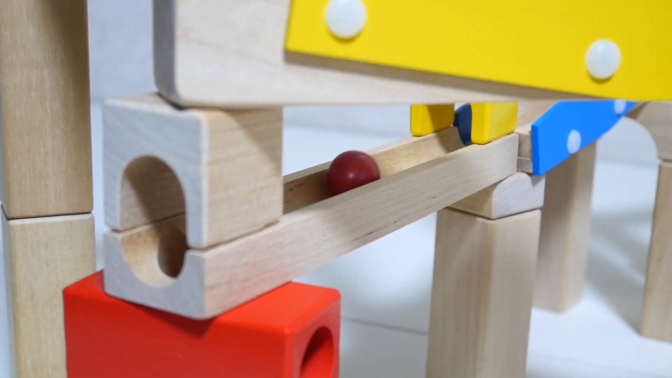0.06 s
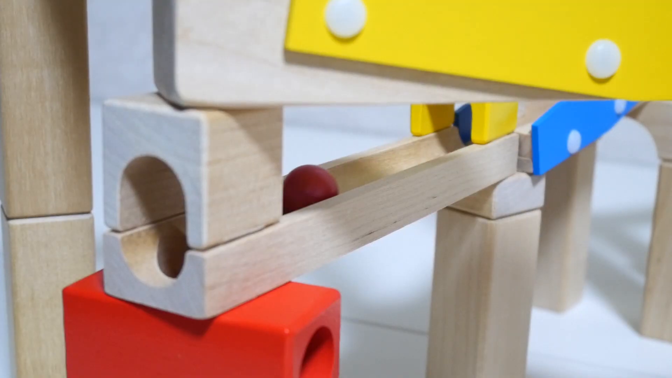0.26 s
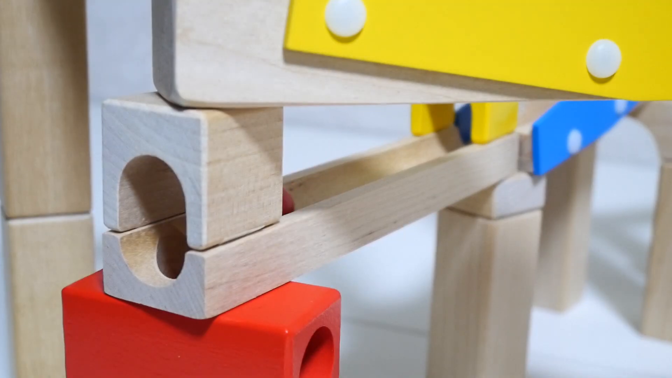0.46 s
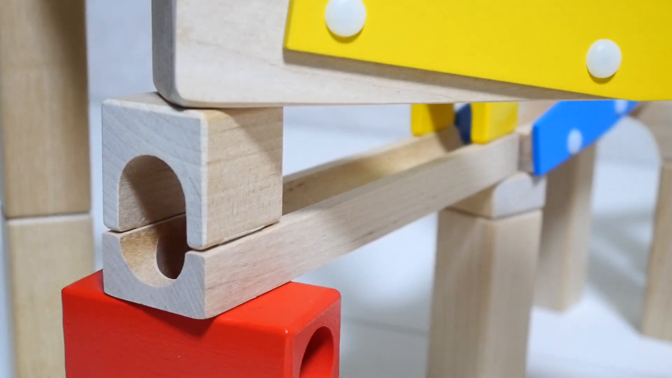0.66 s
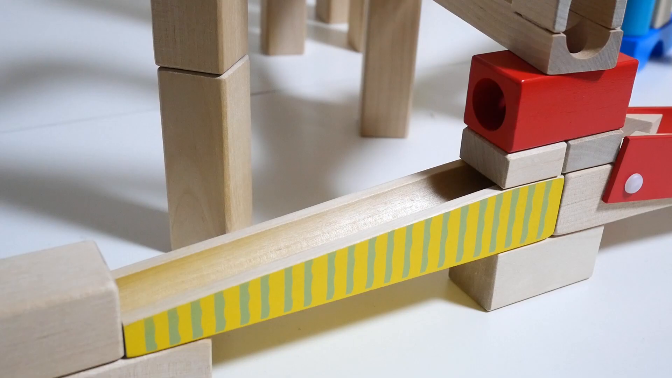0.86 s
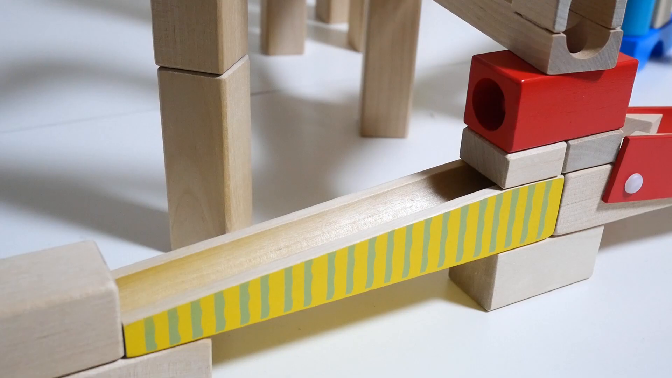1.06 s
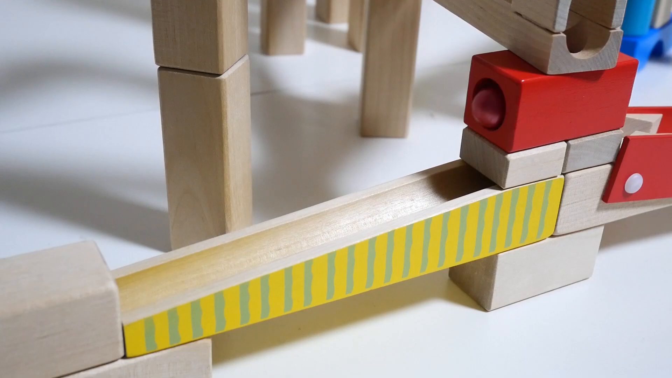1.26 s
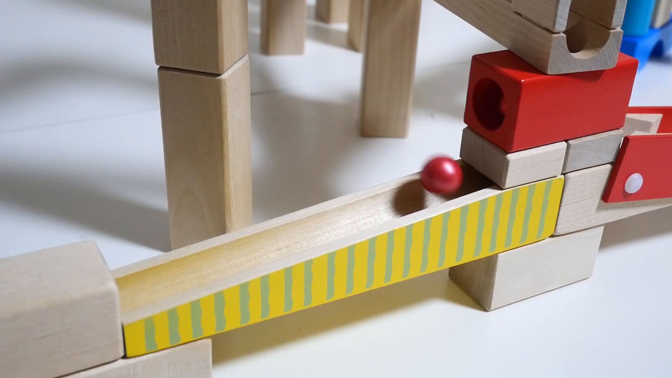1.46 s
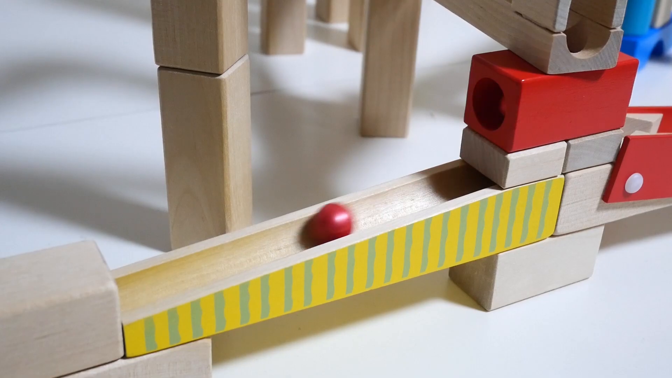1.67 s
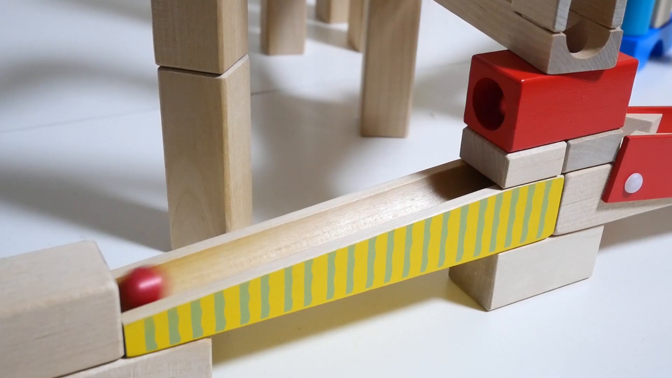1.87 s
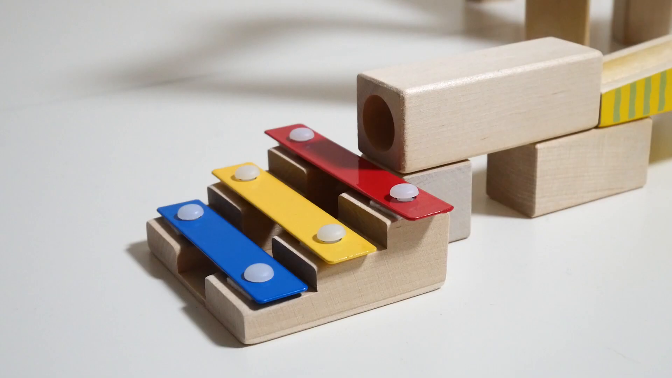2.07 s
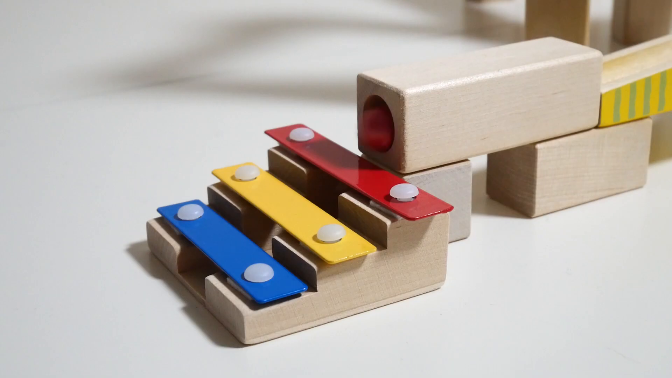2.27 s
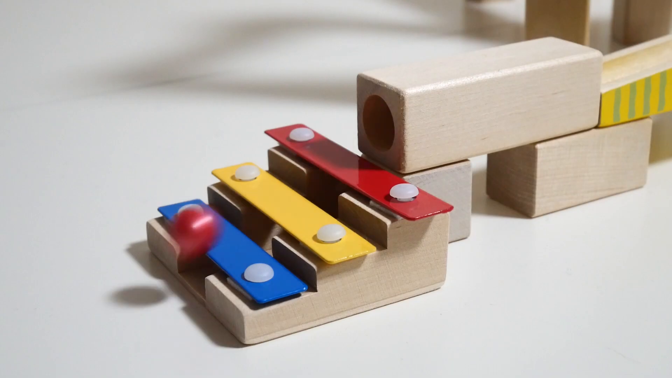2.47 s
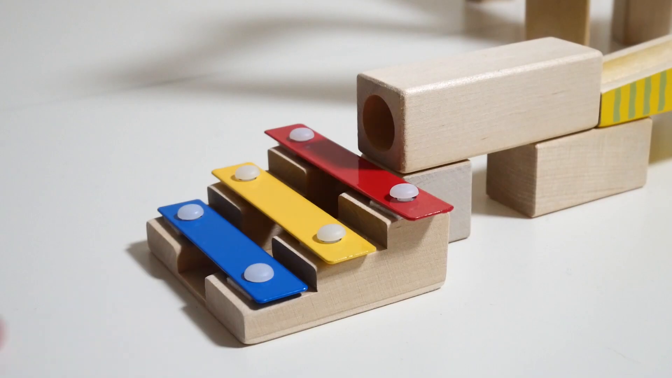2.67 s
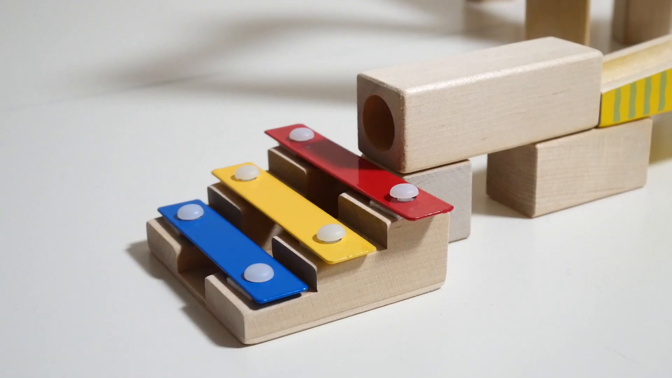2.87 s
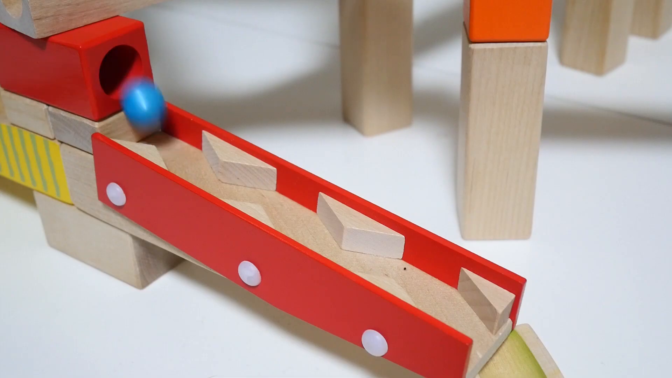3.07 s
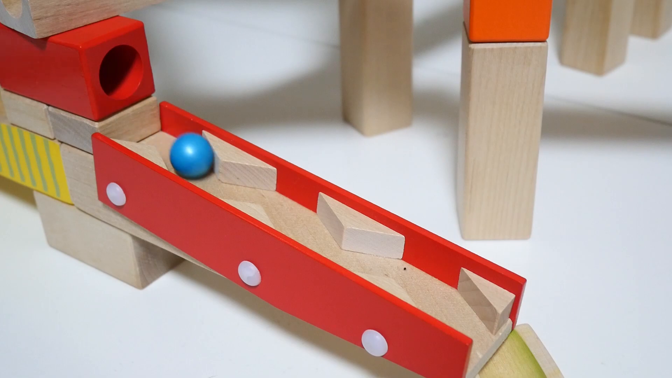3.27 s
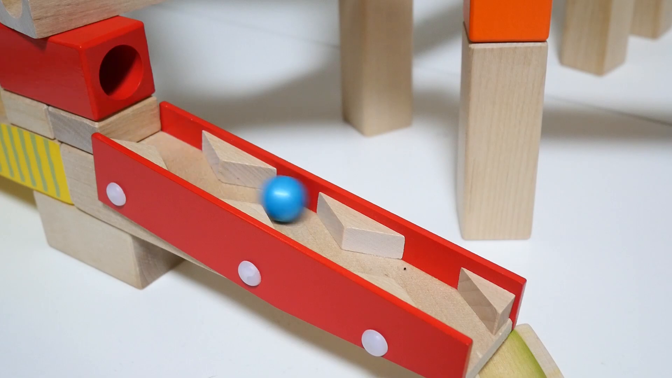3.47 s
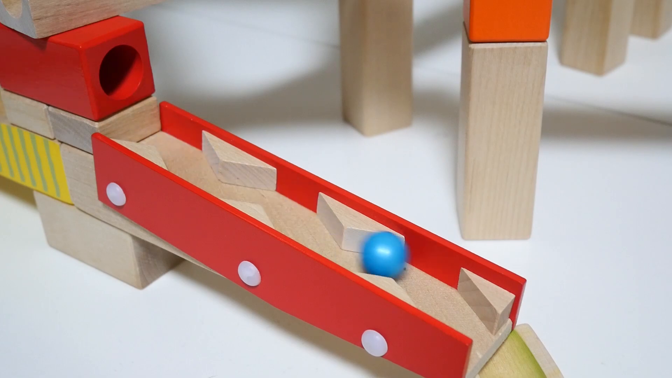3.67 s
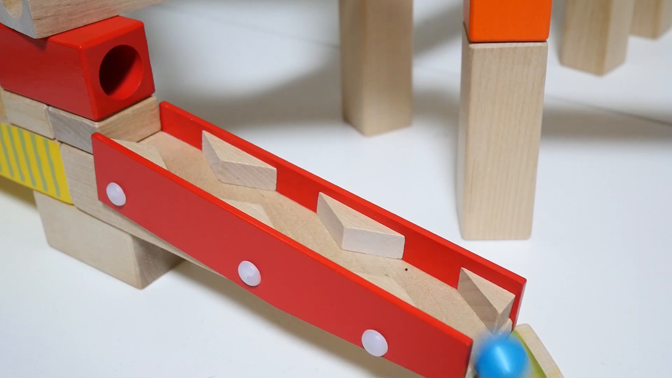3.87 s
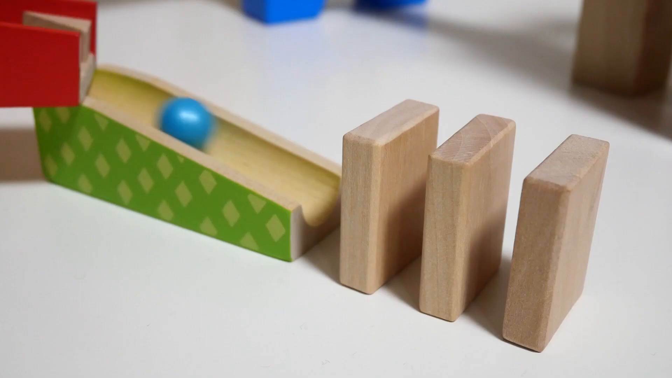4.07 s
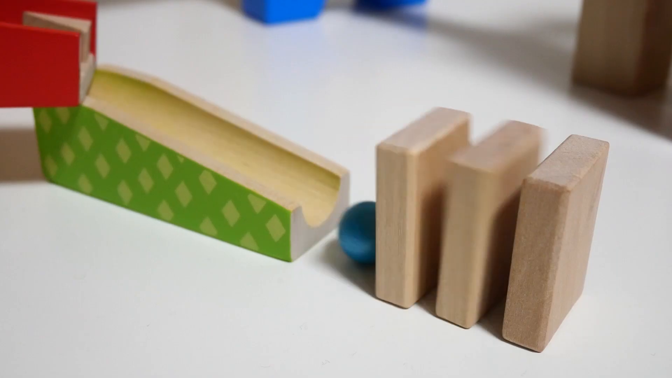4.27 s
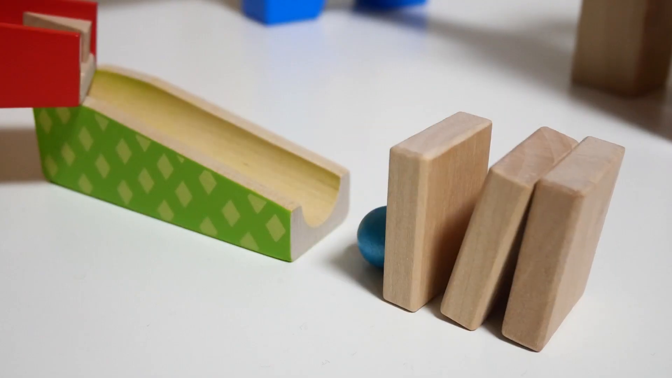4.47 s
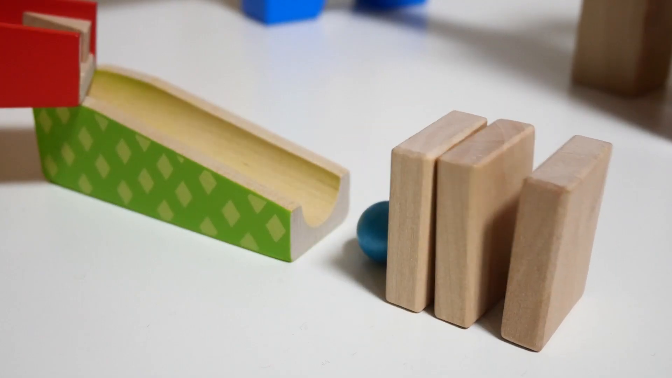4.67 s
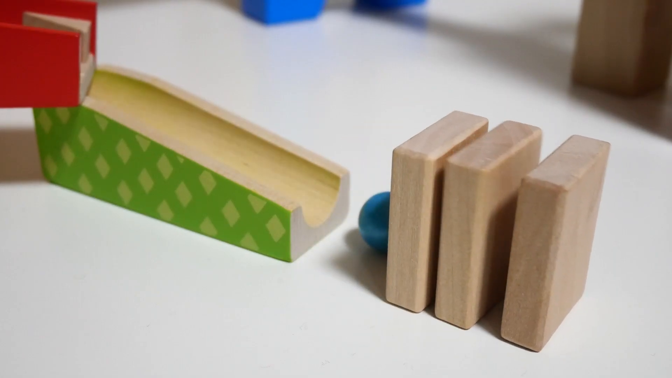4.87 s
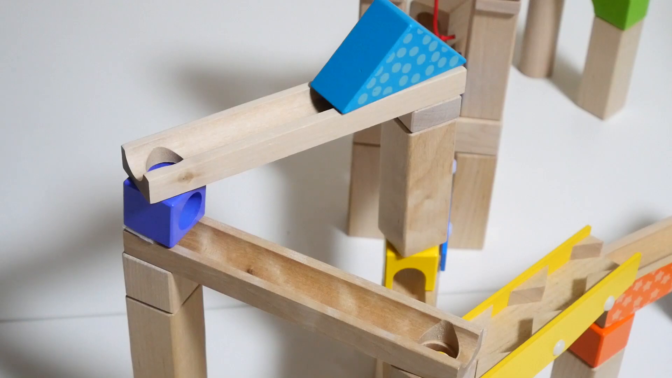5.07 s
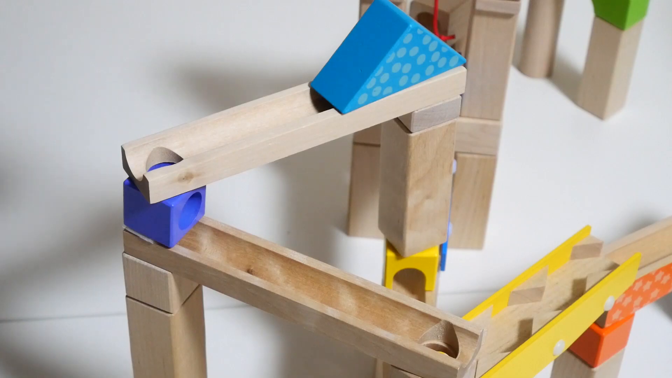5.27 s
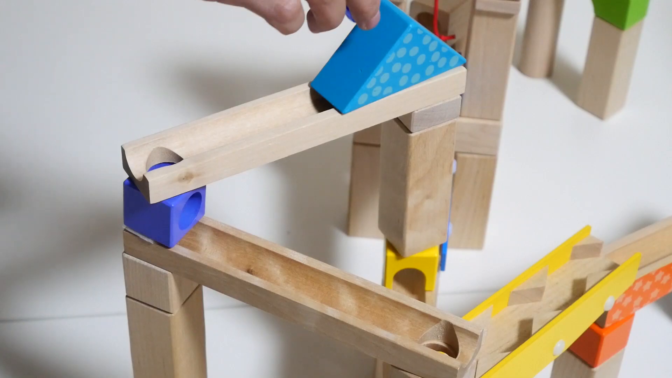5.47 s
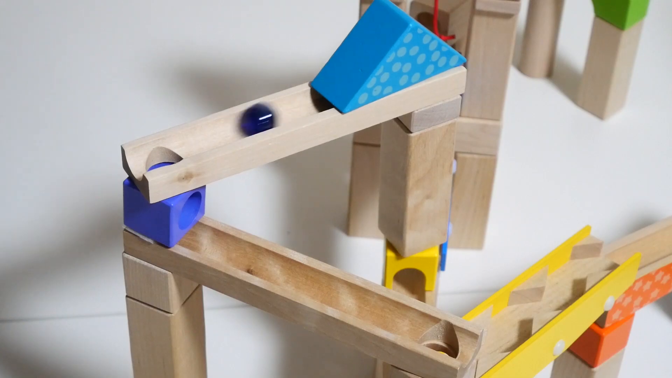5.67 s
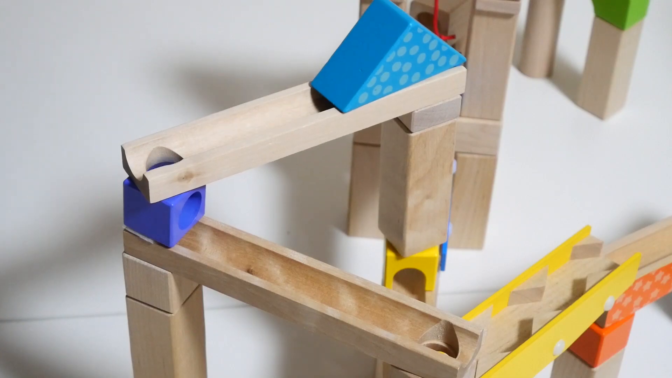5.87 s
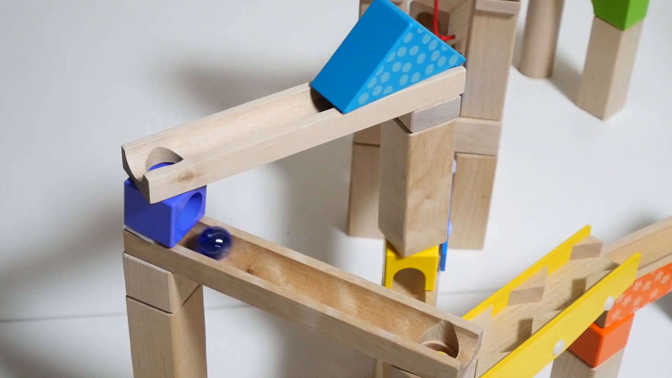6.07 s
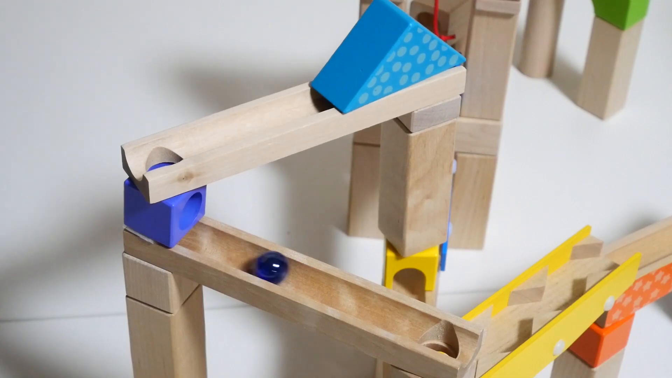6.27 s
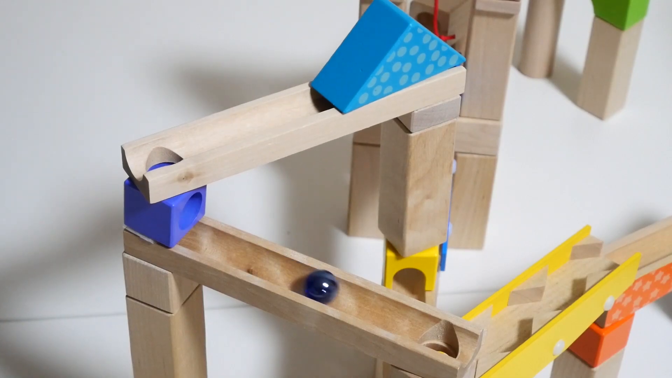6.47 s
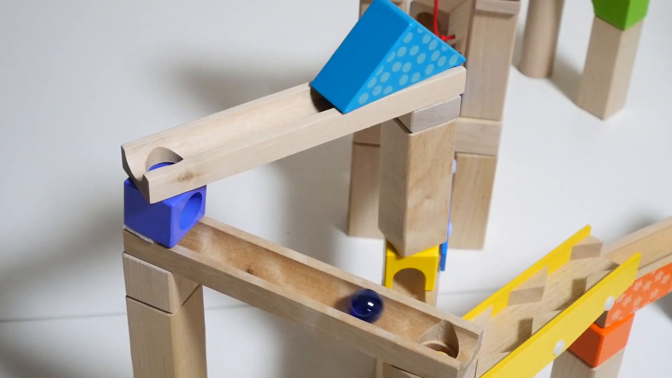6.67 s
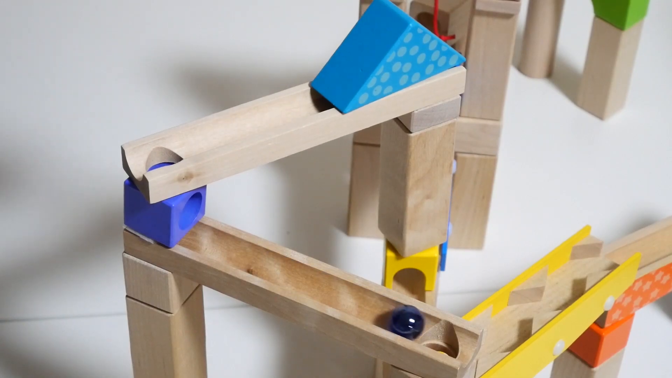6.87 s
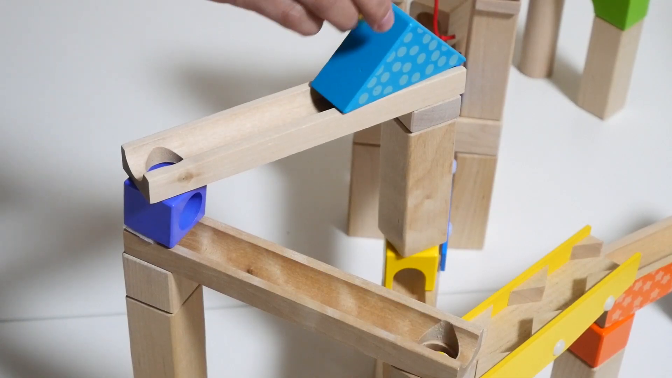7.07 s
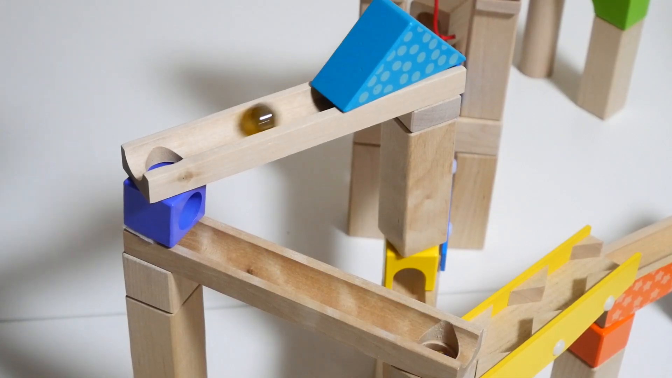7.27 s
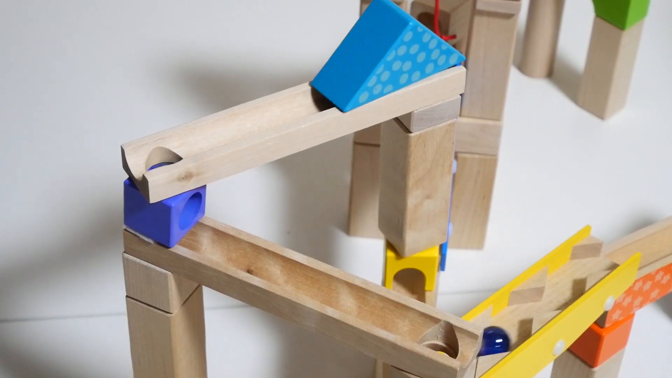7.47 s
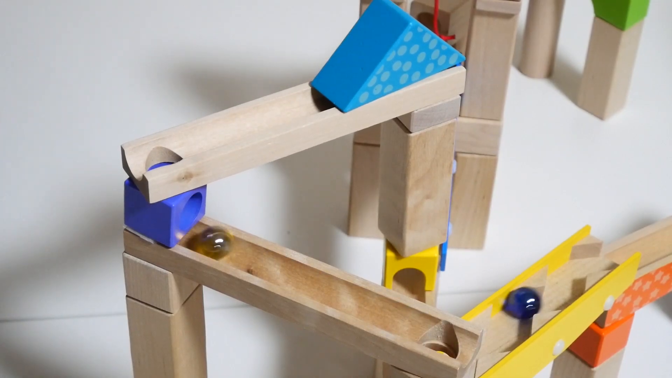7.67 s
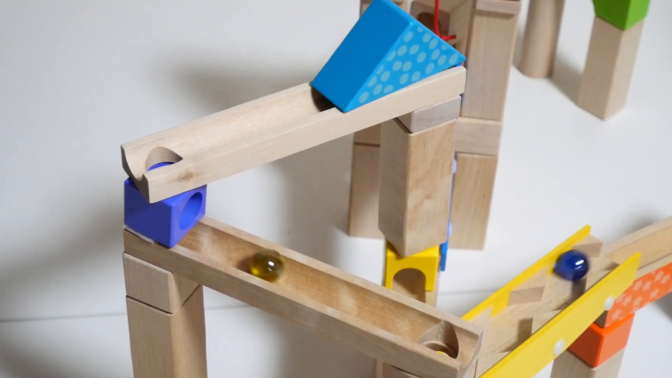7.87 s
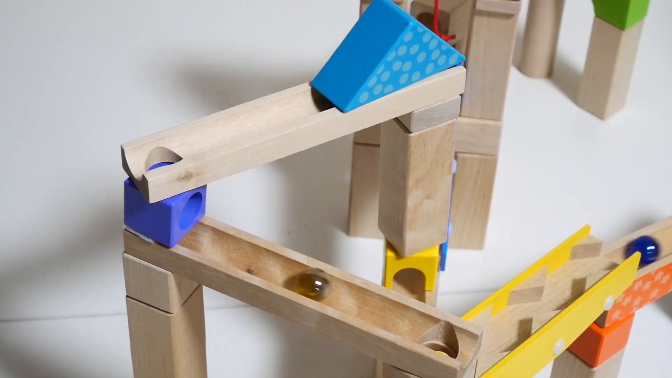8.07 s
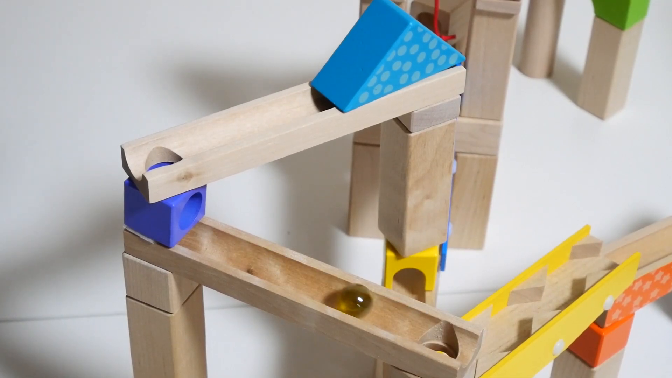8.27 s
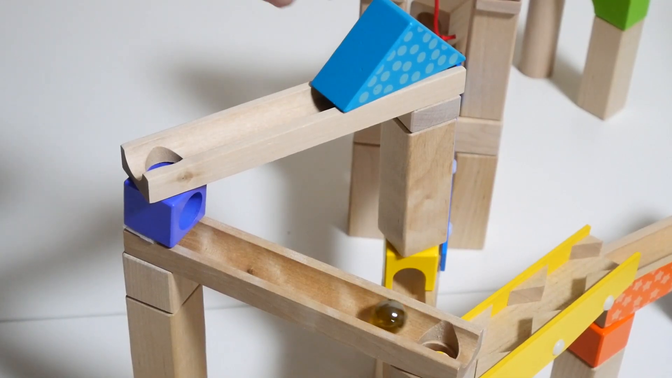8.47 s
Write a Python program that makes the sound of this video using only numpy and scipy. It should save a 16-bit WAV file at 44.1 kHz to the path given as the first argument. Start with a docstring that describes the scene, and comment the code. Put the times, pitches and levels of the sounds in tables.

```python
"""A faint hiss and a low rolling rumble come first: a glass marble on a wooden toy track, close to the microphone.
The track stands on a table in a small live room. Marbles drop through hollow blocks, skip down three metal
chime plates, bounce on the table top, topple dominoes and run down a tower; the runs break off twice.
Contacts are noise clicks, damped wooden modes and a table thump, each with a decaying room tail;
plates are sums of blurred sines, and rolling is a coloured hail of random bumps."""
import sys
import numpy as np
from scipy import signal
from scipy.fft import rfft, irfft, next_fast_len
from scipy.io import wavfile
from scipy.ndimage import map_coordinates

SR = 44100
rng = np.random.default_rng(int(sys.argv[2]) if len(sys.argv) > 2 else 0)


def bounce(signal):
    """Save signal as a 16-bit WAV file at the path given by the first command-line argument."""
    frames = np.transpose(np.atleast_2d(signal))
    limited = np.clip(frames, -1, 1)
    pcm = np.round(limited * 32767).astype(np.int16)
    wavfile.write(sys.argv[1], SR, pcm)


N = 375291

# Resonances of each struck part: pitch_hz, width_hz, level_db (relative, before weighting by width)
BLOCK_MODES = [(640, 67, 7.5), (784, 88, 14), (1108, 150, 5), (1390, 150, -2), (1770, 120, -11),
               (2490, 160, -21), (3115, 100, -17), (4470, 570, 0), (5400, 620, -14.5), (6130, 550, -2)]
CHUTE_MODES = [(780, 140, 1), (1080, 130, -4), (1400, 200, -20.5), (2000, 200, -7), (2400, 180, -19.5),
               (3096, 90, 5.5), (3460, 25, 0), (3890, 60, -0.5), (4730, 200, -19)]
TABLE_MODES = [(679, 32, 9), (950, 340, 3.5), (1020, 120, -0.5), (1543, 130, -9.5), (1830, 50, -9.5),
               (2150, 480, -10), (3040, 640, -20.5), (5700, 500, -20)]
DOMINO_MODES = [(730, 150, -1), (826, 110, 5), (1076, 200, -6), (1430, 300, -12.5), (1900, 270, -11),
                (3370, 400, -41), (4670, 1200, -13.5), (5140, 240, -10.5)]
RAMP_MODES = [(845, 90, -10.5), (1450, 200, -6.5), (1774, 150, 0.5), (2042, 120, 7.5), (2696, 410, 4),
              (3170, 320, 3), (3790, 160, 4), (4300, 590, 8), (4950, 100, 11.5), (5370, 200, 4)]
# Boom of the table top, then the same through the tall tower and the chime frame: pitch_hz, width_hz, level_db
TABLE_BOOM = [(120, 40, -27.5), (205, 50, -14), (261.3, 30, 6), (339, 45, -1), (390, 60, -1),
              (536, 63, -13)]
TOWER_BOOM = [(135, 50, -3), (215, 21, -2.5), (279, 28, 3.5), (345, 42, -4.5), (426, 37, -2),
              (522, 120, -7), (630, 24, -16.5)]
FRAME_BOOM = [(275, 5.3, 0.5), (315, 17, -6), (560, 95, -35.5)]
# Colour of the brief contact of glass on wood, in general and on the chutes: pitch_hz, level_db
CLICK_COLOUR = [(3000, -27), (5700, -14.5), (6300, 1.5), (6900, 3.5), (7900, 0.5), (9000, -7), (11000, -11),
                (13000, -16), (15200, -22), (17000, -38.5)]
CHUTE_CLICK_COLOUR = [(3000, -57), (5900, -26.5), (6400, 4.5), (6750, 12), (7250, -12), (7900, -6),
                      (9000, -19.5), (11000, -22.5), (12800, -20.5), (14500, -33)]
# Strikes on the chime plates: start_s, ring_db, thump_db
PLATE_STRIKES = [(2.3916, -15.5, -26), (2.4635, -13, -22.5), (2.5331, -10.5, -19.5)]
# Modes of each plate, one list per plate: pitch_hz, level_db, t60_s
PLATE_MODES = [
    [(2649, -20, .4), (4404, -17, .4), (6686, -5, .4), (7951, -7, .22), (9415, -10, .33), (10570, -16, .35),
     (12588, 0, .27), (13380, -2, .33)],
    [(3350, -23, .25), (5437, -18, .3), (8268, 2, .3), (8893, -11, .15), (11640, -6, .12), (15190, -6, .18),
     (15400, -5, .16)],
    [(4360, -22, .15), (6255, -7, .2), (9518, -7, .13), (13078, -2, .12), (13313, 0, .24)],
]
# Colour of the rolling rumble on each track, relative: pitch_hz, level_db
UPPER_RUMBLE = [(59, -54.5), (100, -21.5), (187, -27), (329, 4.5), (550, -4), (886, -20.5), (1080, -12),
                (1410, -30), (2000, -37), (2600, -70), (4400, -120)]
CHUTE_RUMBLE = [(59, -61.5), (100, -32.5), (177, -27), (271, 3), (306, -12.5), (407, -11.5), (467, -21),
                (732, -28), (1060, -43.5), (2600, -52), (3380, -86.5), (5720, -120)]
SLALOM_RUMBLE = [(59, -48.5), (100, -28), (224, 2), (319, 3.5), (413, -3.5), (493, -22.5), (762, -18.5),
                 (1040, -32), (2400, -34.5), (2600, -27.5), (3380, -58), (5720, -120)]
RAMP_RUMBLE = [(59, -57.5), (100, -33.5), (181, -13), (220, -23), (278, 4.5), (437, -13), (524, -7),
               (566, -11.5), (627, -16), (2200, -47), (2860, -73), (4840, -120)]
TABLE_RUMBLE = [(100, -24), (280, 1), (650, -2), (1100, -1), (2000, -8.5), (3500, -20), (5500, -25.5),
                (7000, -21), (11000, -27.5), (15000, -36.5)]
# Colour of the background hiss, relative: pitch_hz, level_db (per Hz)
HISS_COLOUR = [(15, -38), (25, -7.5), (97, -1), (135, -11), (202, -8.5), (651, -12.5), (854, -13),
               (1030, -12.5), (2040, -22), (2530, -21), (3150, -21.5), (6210, -23), (15200, -23.5),
               (16500, -52)]
# Course of the hiss: time_s, level_db
HISS_COURSE = [(0, -64), (4.95, -64.5), (5, -64), (5.2, -59.5), (5.4, -64.5), (8.51, -64)]
# Decay of the room, before the linger factor of each contact: pitch_hz, t60_s
ROOM_DECAY = [(100, 0.22), (270, 0.4), (700, 0.51), (1800, 0.46), (5000, 0.42), (8000, 0.29), (13000, 0.25)]
# Likeness of left and right in diffuse sound: pitch_hz, likeness (0 to 1)
LEFT_RIGHT_LIKENESS = [(100, 0.99), (400, 1), (1000, .94), (2500, 0.84), (6000, 0.86), (13000, 0.89)]
# Moments when the sound of a run breaks off: time_s
BREAK_TIMES = [2.953, 4.973]
# A marble tips over a lip and lands below: part, landing_s, fall_s, lip_db (relative),
# wood_db, thump_db, click_db, note_hz
LIP_DROPS = [("block", .8563, .0373, -13, -24.5, -13.5, -23, 5900),
             ("chute", 1.533, .005, -18, -35, -26, -35, 1100),
             ("chute", 1.64, .024, -11, -25.5, -25.5, -21, 3890),
             ("block", 3.198, .021, -5, -28, -20.5, -23, 1950),
             ("block", 4.1425, .0305, -2, -27, -20, -26, 760),
             ("lower ramp", 7.161, .031, -13, -38, -19.5, -48, 790),
             ("chute", 8.141, .012, -12, -27.5, -22, -39, 3200)]
# Soft bumps, a marble at a joint or wall, or a domino settling: part, start_s, thump_db, wood_db, note_hz
SOFT_BUMPS = [("block", 1.375, -54, -66, 720), ("chute", 2.061, -36, -53, 3250),
              ("chute", 2.118, -31, -57, 4300), ("chute", 2.144, -33, -53, 4300),
              ("block", 3.246, -24, -31, 1360), ("domino", 4.701, -50, -49, 1510),
              ("domino", 4.795, -55, -55, 880), ("domino", 4.88, -46, -52, 730),
              ("upper ramp", 5.66, -45, -37, 1720), ("upper ramp", 7.236, -28, -34, 1790),
              ("lower ramp", 7.376, -21, -34, 2790)]
# A marble glances off the pegs of a slalom: part, start_s, strength_db
PEG_TOUCHES = [("block", 3.454, -48), ("block", 3.577, -44), ("block", 3.69, -37), ("block", 3.798, -49),
               ("block", 3.858, -43), ("block", 3.99, -37), ("lower ramp", 7.959, -46),
               ("lower ramp", 8.012, -37), ("lower ramp", 8.082, -39)]
# Dominoes fall against each other and settle: start_s, strength_db, note_hz
DOMINO_FALLS = [(4.283, -22.5, 4600), (4.2988, -20.5, 832), (4.387, -35, 1420), (4.716, -45, 1600)]
# The five spots every marble meets on the tower: part, wood_db, thump_db, click_db, note_hz (all dB relative)
# In order: entry hood, head of the ramp, rim of the hole, hollow block, landing below
TOWER_ROUTE = [("upper ramp", -31, -32, -48, 1750), ("upper ramp", -21.5, -29, -20.5, 2100),
               ("upper ramp", -28, -35, -32, 4900), ("upper ramp", -28, -29, -32, 2400),
               ("lower ramp", -21.5, -21.5, -18.5, 760)]
# Marbles sent down the tower: strength_db, arrivals_s (one at each spot)
TOWER_MARBLES = [(-1, (5.627, 5.71, 5.905, 5.988, 6.157)), (1, (7.22, 7.3115, 7.518, 7.585, 7.7603))]
# Stretches of rolling, gaining or losing speed: track (whose colour it takes), start_s, end_s, first_db, last_db
# The first chute row is a marble rolling inside the block, in the chute's colour.
ROLL_STRETCHES = [("upper", 0, .83, -56, -59), ("chute", .95, 1.12, -42, -58),
                  ("chute", 1.76, 2.15, -39, -36), ("chute", 2.2, 2.56, -41, -47),
                  ("table", 2.62, 2.953, -31, -40), ("slalom", 3.03, 3.1, -45, -49),
                  ("slalom", 3.3, 3.72, -45, -33), ("slalom", 3.83, 4.4, -32, -43),
                  ("slalom", 4.72, 4.97, -49, -60), ("ramp", 6.3, 7.13, -53, -57),
                  ("ramp", 7.18, 7.4, -39, -52), ("ramp", 7.84, 8.51, -37, -47)]
# A marble hops once more after a landing: part, start_s, wood_db, click_db, note_hz
SMALL_HOPS = [("table", 2.884, -36, -46, 1310), ("upper ramp", 6.024, -36, -43, 2700),
              ("lower ramp", 6.2125, -50, -30, 3950)]

# Bounces on the table: shrink is each flight over the last, loss is per bounce
LANDING_S, FLIGHT_S, SHRINK, LANDING_DB, LOSS_DB = 2.611, .0708, .6, -17.5, 3.2
# How fast the rumble swells before a stretch and dies after it
SWELL_DB_PER_S, FADE_DB_PER_S = 350, 130
TOWER_ECHO_S = .0086  # delay of the table's reflection for the high ramp
TOP_HZ = 15900  # upper band limit
T = np.arange(int(.6 * SR)) / SR  # time axis of one contact and its tail, in s


def amp(db):
    """Decibels to gain."""
    return 10 ** (np.asarray(db) / 20)


def unit(x):
    """Scale to rms 1."""
    return x / np.sqrt(np.mean(x ** 2) + 1e-20)


def blow(x):
    """Scale to the energy of 10 ms at rms 1."""
    return x / np.linalg.norm(x) * np.sqrt(SR / 100)


def along(points, hz):
    """Read a curve of (pitch_hz, value) points on a log pitch axis."""
    pitch_hz, value = np.transpose(points)
    return np.interp(np.log(hz + 1), np.log(pitch_hz), value)


def level(rows):
    """Gain per sample from (time_s, level_db) rows, all but silent outside them."""
    return amp(np.interp(np.arange(N) / SR, *np.transpose(rows), left=-120, right=-120))


def filtered(x, response):
    """Multiply the spectrum of x by a response of frequency."""
    size = next_fast_len(x.shape[-1] + 2048)
    spectrum = rfft(x, size) * response(np.fft.rfftfreq(size, 1 / SR))
    return irfft(spectrum, size)[..., :x.shape[-1]]


def causal(gain_db, size=1024):
    """Minimum-phase impulse response of a dB curve, by folding its cepstrum."""
    cepstrum = irfft(np.log(amp(gain_db(np.fft.rfftfreq(size, 1 / SR)))))
    folded = np.r_[cepstrum[0], 2 * cepstrum[1:size // 2]]
    return irfft(np.exp(rfft(folded, size)))


def spread(pair):
    """Two unrelated signals become the left and right of a diffuse sound, more alike at some pitches."""
    def mid_side(hz):
        turn = np.arccos(np.clip(along(LEFT_RIGHT_LIKENESS, hz), 0, 1)) / 2
        return np.array([np.cos(turn), np.sin(turn)])

    mid, side = filtered(pair, mid_side)
    return np.array([mid + side, mid - side])


def in_room(x, wet_db, linger=0.77, gap_s=0.0059, build_s=0.0045):
    """Add the room's answer: diffuse noise that decays by pitch, drawn anew for each contact."""
    noise = rng.standard_normal((2, len(T)))
    hz, t, bands = signal.stft(noise, SR, nperseg=256)
    decay = amp(-60 * t / (linger * along(ROOM_DECAY, hz)[:, None]))
    tail = signal.istft(bands * decay, SR, nperseg=256)[1][:, :len(T)]
    tail = spread(tail * np.clip((T - gap_s) / build_s, 0, 1))
    tail = tail / np.linalg.norm(tail[0])
    return x + amp(wet_db) * signal.fftconvolve(x[None], tail, axes=1)[:, :len(T)]


def next_break(s):
    """When the sound that starts at s is cut off."""
    return min([b for b in BREAK_TIMES if b > s] + [N / SR])


def add(out, s, x):
    """Mix x in at time s; it ends at the next break."""
    part = out[:, round(s * SR):round(next_break(s) * SR)][:, :len(T)]
    part += x[:, :part.shape[1]]


def ring(modes, scatter_db, rise_s=0.00045):
    """Damped modes that swell over the contact time; every blow weights them anew if scattered."""
    hz, width, db = np.transpose(modes)[:, :, None]
    size = amp(db + scatter_db * rng.standard_normal(hz.shape)) * width
    t = T[:len(T) // 4]
    swing = np.sin(2 * np.pi * (hz * t + rng.random(hz.shape)))
    damped = np.sum(size * np.exp(-np.pi * width * t) * swing, 0)
    x = damped * (1 - np.exp(-t / rise_s))
    return np.pad(blow(x), (0, len(T) - len(t)))


def crack(colour, t60_s, rise_s=.0001):
    """A burst of dense, quickly dying vibration: decaying noise of a given colour."""
    burst = rng.standard_normal(len(T)) * amp(-60 * T / t60_s) * (1 - np.exp(-T / rise_s))
    return blow(signal.fftconvolve(burst, causal(colour))[:len(T)])


def hiss():
    """Diffuse background of room and microphone: coloured noise following its level course."""
    noise = spread(rng.standard_normal((2, N)))
    return level(HISS_COURSE) * unit(filtered(noise, lambda hz: amp(along(HISS_COLOUR, hz))))


def roll_level(track):
    """Gain per sample on one track: each stretch swells, changes steadily and fades, or ends at a break."""
    t, gain = np.arange(N) / SR, np.zeros(N)
    for name, start, end, first_db, last_db in ROLL_STRETCHES:
        if name == track:
            outside_db = SWELL_DB_PER_S * np.maximum(start - t, 0) + FADE_DB_PER_S * np.maximum(t - end, 0)
            inside_db = np.interp(t, [start, end], [first_db, last_db])
            gain += amp(inside_db - outside_db) * (t < next_break(start))
    return gain


def rolling(track, colour, bumps_per_s=500, lurch_db=2.5, lurch_hz=22):
    """The marble rides over the wood grain: a hail of tiny bumps drums on track and table."""
    jolts = (rng.random(N) < bumps_per_s / SR) * rng.standard_normal(N)
    # The strength of the bumps wanders smoothly.
    points = rng.standard_normal(int(N * lurch_hz / SR) + 4)
    lurch = map_coordinates(points, [np.arange(N) * lurch_hz / SR])
    wash = spread(rng.standard_normal((2, N)))  # the bumps blurred by the room
    drive = unit(jolts) + 0.79 * wash
    rumble = filtered(drive * amp(lurch_db * lurch), lambda hz: amp(along(colour, hz)))
    return roll_level(track) * unit(rumble)


def knocks(hits, modes, boom, click, click_t60_s, grain_db, focus_db, note_db, note_q,
           echo_s, echo_db, wet_db, linger):
    """Each contact clicks, rings the wooden part and thumps the table, which also mirrors the sound."""
    out = np.zeros((2, N))
    # Crowded weak modes of wood: pitch_hz, level_db
    grain = [(250, -27), (600, -2.5), (1500, -2.5), (5500, -6.5), (9000, -32)]
    for s, thump_db, wood_db, click_db, hard_db, note_hz in hits:
        # The struck spot favours one note; a soft contact with little click sounds it more purely.
        soft = np.clip((wood_db - click_db) / 12, 0, 1)
        favour = lambda hz: -focus_db * (1 + 2.6 * soft) * np.abs(np.log2((hz + 1) / note_hz))
        favoured = [(hz, width, db + favour(hz)) for hz, width, db in modes]
        body = ring(favoured, scatter_db=3, rise_s=.0012)
        note = amp(note_db + 6 * soft) * ring([(note_hz, 40 + note_hz / note_q, 0)], 0, rise_s=.0018)
        fibres = crack(lambda hz: along(grain, hz) + favour(hz), t60_s=.035, rise_s=.0017)
        wood = amp(wood_db) * blow(body + note + amp(grain_db) * fibres)
        # Hardness tilts the click from 8 kHz up.
        hardness = lambda hz: np.clip(hard_db, -14, 14) * along([(8000, 0), (10500, 1)], hz)
        glass = amp(click_db) * crack(lambda hz: along(click, hz) + hardness(hz), click_t60_s)
        mirrored = amp(echo_db) * (wood + amp(-11) * glass)  # a little duller
        mirrored = np.pad(mirrored, (round(echo_s * SR), 0))[:len(T)]
        thump = amp(thump_db) * ring(boom, scatter_db=0, rise_s=.0012)
        add(out, s, in_room(wood + glass + mirrored + thump, wet_db, linger))
    return out


def drops(lip_thump_db=1, lip_click_db=-9, rebound_s=.0095, rebound_db=-7, rebound_click_db=-15,
          hard_db=0, rebound_hard_db=6):
    """A soft tap on the lip, the landing, and one quick small rebound."""
    for part, s, fall_s, lip, wood, thump, click, note in LIP_DROPS:
        yield part, s - fall_s, thump + lip + lip_thump_db, wood + lip, click + lip + lip_click_db, hard_db, note
        yield part, s, thump, wood, click, hard_db, note
        yield (part, s + rebound_s, thump + 2 * rebound_db, wood + rebound_db,
               click + rebound_click_db, rebound_hard_db, note)


def bumps(click_db=-16, hard_db=9):
    """Soft bumps, a marble at a joint or wall or a domino settling; the click lies well below the wood."""
    return [(part, s, thump, wood, wood + click_db, hard_db, note)
            for part, s, thump, wood, note in SOFT_BUMPS]


def chimes(wet_db=-7, tick_db=-9, buzz_db=-18, frame_wet_db=-2, blur_hz=4):
    """The marble skips down three small metal plates on a wooden frame: tick, ringing modes, buzz and thump."""
    out = np.zeros((2, N))
    # Colour of the buzz: pitch_hz, level_db
    rattle = [(500, -11.5), (2000, -23), (3300, -1.5), (4500, -3), (5700, -13), (8000, -7), (14000, -11.5)]
    brighter = [(8000, -7), (13000, 14.5)]  # tilt of the tick: pitch_hz, level_db
    for (s, ring_db, thump_db), modes in zip(PLATE_STRIKES, PLATE_MODES):
        metal = np.zeros(len(T))
        for hz, db, t60_s in modes:
            # Loose pins blur each line: its phase wanders at random.
            waver = np.cumsum(rng.standard_normal(len(T))) * np.sqrt(2 * np.pi * blur_hz / SR)
            metal += amp(db - 60 * T / t60_s) * np.sin(2 * np.pi * hz * T + waver)
        tick = amp(tick_db) * crack(lambda hz: along(CLICK_COLOUR, hz) + along(brighter, hz), t60_s=.015)
        # The loosely pinned plate buzzes briefly on its frame.
        buzz = amp(buzz_db) * crack(lambda hz: along(rattle, hz), t60_s=.15, rise_s=.003)
        thump = amp(thump_db) * ring(FRAME_BOOM, scatter_db=0.5, rise_s=.0027)
        add(out, s, in_room(amp(ring_db) * metal, wet_db))
        add(out, s, in_room(amp(ring_db) * (tick + buzz) + thump, frame_wet_db))
    return out


def bounces(count=6, thump_db=-.5, click_db=-1.5, softening=1.7, hard_db=7, note_hz=1060):
    """Ever shorter flights on the table; thump and click fade faster than the ring of the wood."""
    for k in range(count):
        s = LANDING_S + FLIGHT_S * sum(SHRINK ** j for j in range(k))
        wood_db = LANDING_DB - LOSS_DB * k
        soft_db = LANDING_DB - softening * LOSS_DB * max(k - .5, 0)
        yield "table", s, soft_db + thump_db, wood_db, soft_db + click_db, hard_db, note_hz


def hops(hard_db=10):
    """Small, bright skips after a landing, with thump and wood equally strong."""
    return [(part, s, wood, wood, click, hard_db, note) for part, s, wood, click, note in SMALL_HOPS]


def pegs(thump_db=5, click_db=-4, hard_db=-6, note_hz=2900, note_spread=.25, rattle_s=.016, rattle_db=-8):
    """A light tick and a smaller rattle at each peg; every contact has a slightly different note."""
    for part, s, db in PEG_TOUCHES:
        for delay, loss_db in ((0, 0), (rattle_s * rng.uniform(.5, 1.5), rattle_db)):
            note = note_hz * np.exp(note_spread * rng.standard_normal())
            wood = db + loss_db
            yield part, s + delay, wood + thump_db, wood, db + 2 * loss_db + click_db, hard_db, note


def topples(thump_db=-1, click_db=-2, hard_db=3):
    """Flat clacks of wood on wood as dominoes fall."""
    return [("domino", s, db + thump_db, db, db + click_db, hard_db, note) for s, db, note in DOMINO_FALLS]


def far_tap(s=5.153, db=-52):
    """A faint tap from across the room: two damped modes with a strong room tail."""
    out = np.zeros((2, N))
    tap = ring([(1200, 130, 1.5), (1990, 300, -11.5)], scatter_db=0, rise_s=.0014)
    add(out, s, in_room(amp(db) * tap, wet_db=0.5))
    return out


def tower_runs(hard_db=3, rattle_s=.011, rattle_db=-8, rattle_click_db=-18):
    """Each marble strikes the spots of the route in turn and rattles once against the side after each."""
    for db, times in TOWER_MARBLES:
        for s, (part, wood, thump, click, note) in zip(times, TOWER_ROUTE):
            yield part, s, db + thump, db + wood, db + click, hard_db, note
            yield (part, s + rattle_s * rng.uniform(.5, 1.5), db + thump + rattle_db, db + wood + rattle_db,
                   db + click + rattle_click_db, hard_db, note)


def contacts(part):
    """All contacts with one part: start_s, thump_db, wood_db, click_db, hard_db (extra treble), note_hz."""
    every = [*drops(), *bumps(), *bounces(), *hops(), *pegs(), *topples(), *tower_runs()]
    return [row[1:] for row in every if row[0] == part]


def scene():
    """All the runs, one after another, over the background hiss."""
    rolls = (rolling("upper", UPPER_RUMBLE) + rolling("chute", CHUTE_RUMBLE)
             + rolling("table", TABLE_RUMBLE, bumps_per_s=320)
             + rolling("slalom", SLALOM_RUMBLE) + rolling("ramp", RAMP_RUMBLE))
    block = knocks(contacts("block"), BLOCK_MODES, TABLE_BOOM, CLICK_COLOUR, click_t60_s=.01,
                   grain_db=-0.5, focus_db=2.5, note_db=-9.5, note_q=25,
                   echo_s=.003, echo_db=-9.5, wet_db=-3, linger=.86)
    chute = knocks(contacts("chute"), CHUTE_MODES, TABLE_BOOM, CHUTE_CLICK_COLOUR, click_t60_s=.018,
                   grain_db=-2, focus_db=0.5, note_db=-5, note_q=22,
                   echo_s=.0016, echo_db=-13, wet_db=-1.5, linger=.83)
    table = knocks(contacts("table"), TABLE_MODES, TABLE_BOOM, CLICK_COLOUR, click_t60_s=.011,
                   grain_db=-0.5, focus_db=3.2, note_db=-18.5, note_q=12,
                   echo_s=.0035, echo_db=-11.5, wet_db=-2.5, linger=1)
    domino = knocks(contacts("domino"), DOMINO_MODES, TABLE_BOOM, CLICK_COLOUR, click_t60_s=.023,
                    grain_db=-3.5, focus_db=4, note_db=-6, note_q=9,
                    echo_s=.0023, echo_db=-16, wet_db=-4, linger=.82)
    upper_ramp = knocks(contacts("upper ramp"), RAMP_MODES, TOWER_BOOM, CLICK_COLOUR, click_t60_s=.033,
                        grain_db=-1.5, focus_db=2, note_db=-6.5, note_q=25,
                        echo_s=TOWER_ECHO_S, echo_db=-12.5, wet_db=-1, linger=.87)
    lower_ramp = knocks(contacts("lower ramp"), RAMP_MODES, TABLE_BOOM, CLICK_COLOUR, click_t60_s=.025,
                        grain_db=-1, focus_db=0.8, note_db=-11, note_q=8,
                        echo_s=TOWER_ECHO_S, echo_db=-10, wet_db=-1, linger=.85)
    hits = block + chute + table + domino + upper_ramp + lower_ramp
    return hiss() + rolls + hits + chimes() + far_tap()


def record(dry, low_cut_hz=55):
    """The microphone chain thins the deep bass and cuts steeply above its band limit."""
    thinned = signal.sosfilt(signal.butter(1, low_cut_hz, "high", fs=SR, output="sos"), dry)
    return filtered(thinned, lambda hz: 1 / np.sqrt(1 + (hz / TOP_HZ) ** 120))


dry = scene()
out = record(dry)
bounce(out)
```